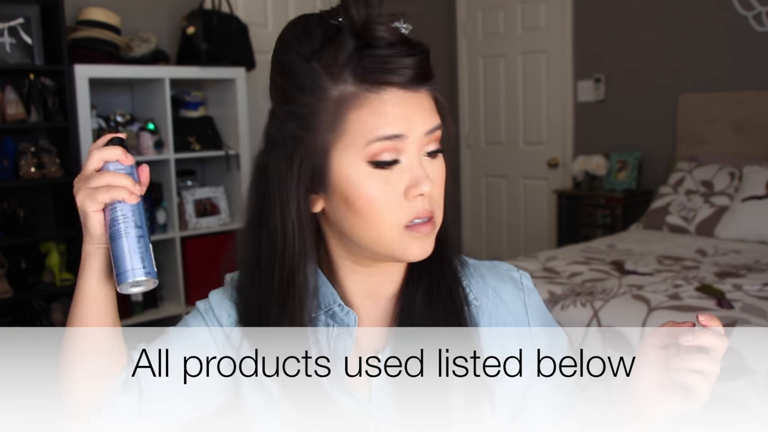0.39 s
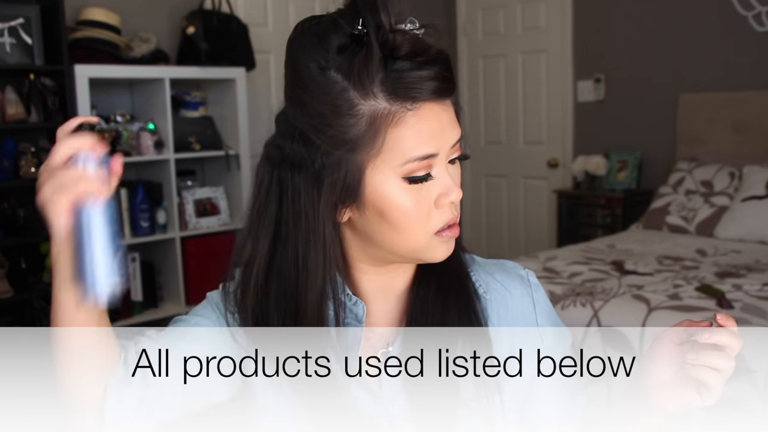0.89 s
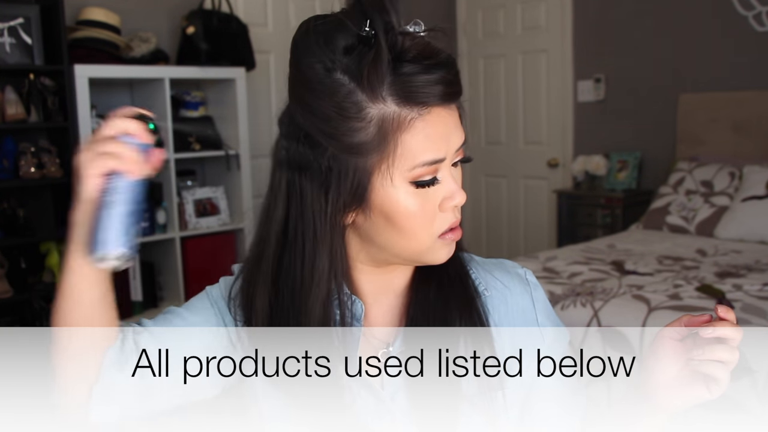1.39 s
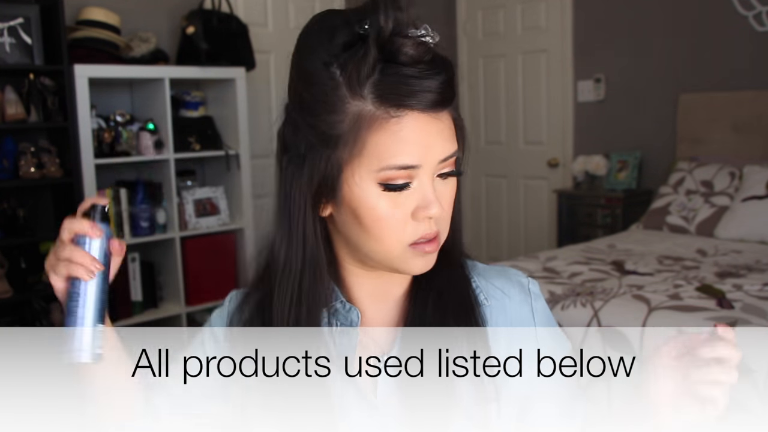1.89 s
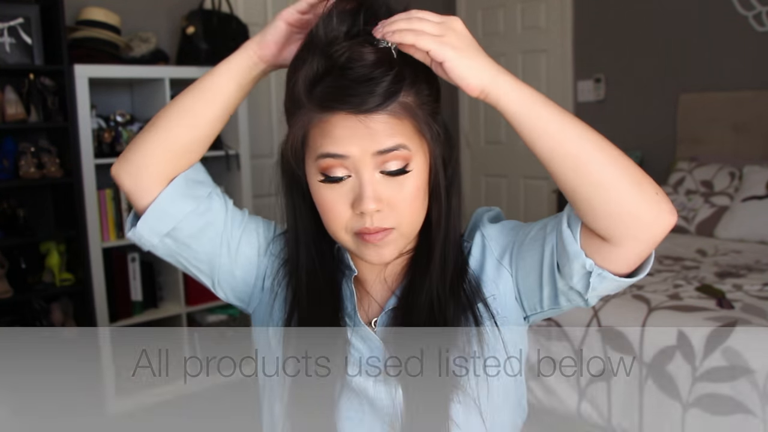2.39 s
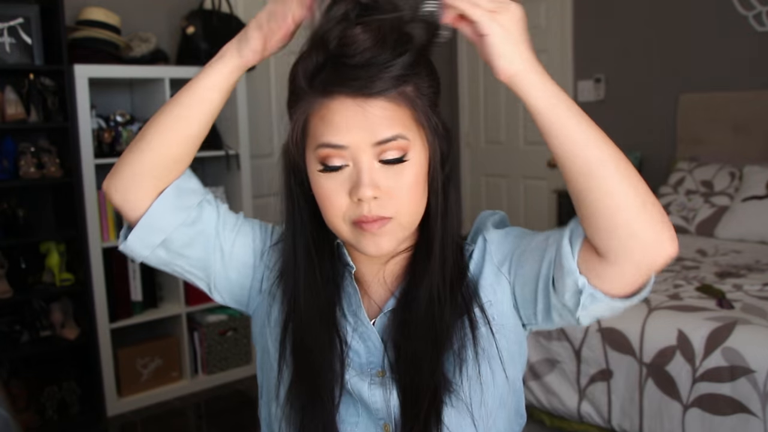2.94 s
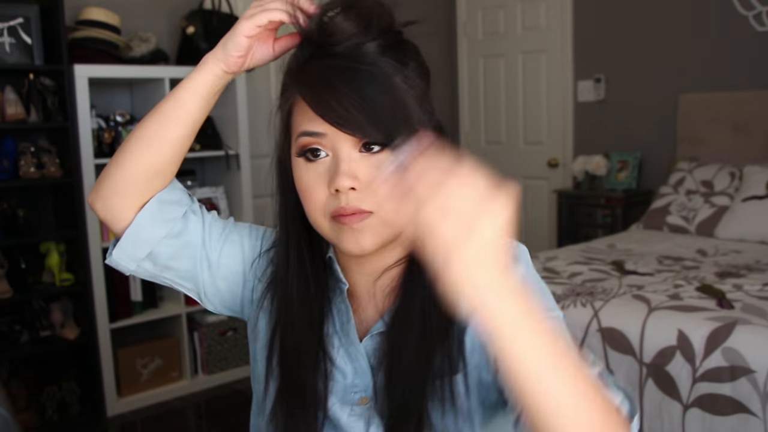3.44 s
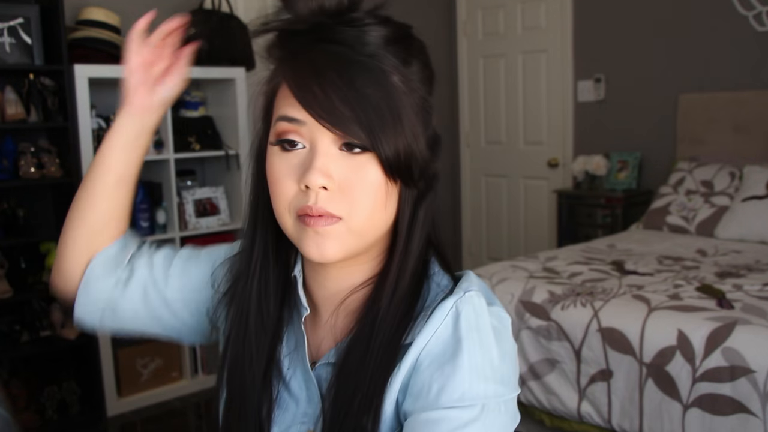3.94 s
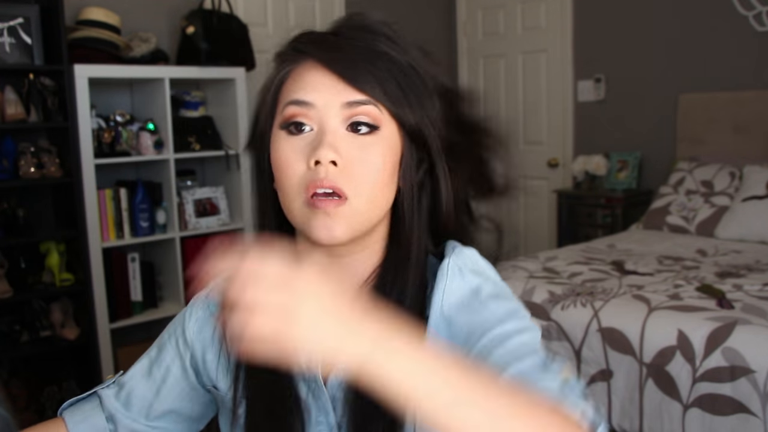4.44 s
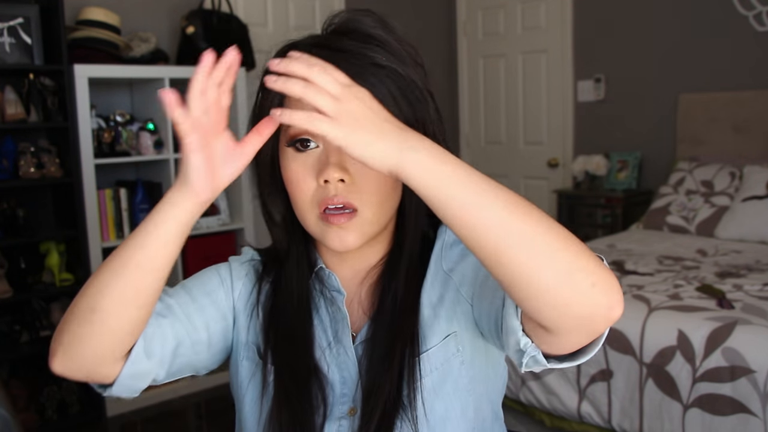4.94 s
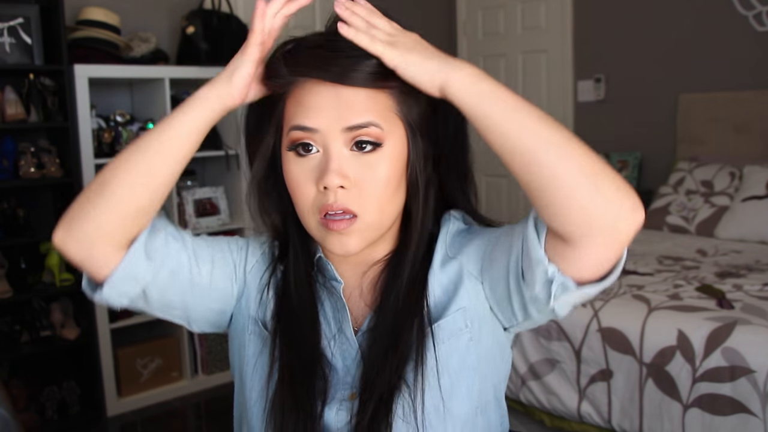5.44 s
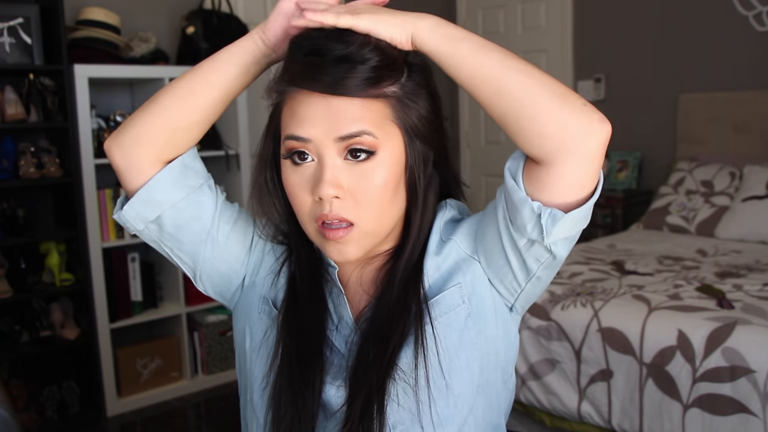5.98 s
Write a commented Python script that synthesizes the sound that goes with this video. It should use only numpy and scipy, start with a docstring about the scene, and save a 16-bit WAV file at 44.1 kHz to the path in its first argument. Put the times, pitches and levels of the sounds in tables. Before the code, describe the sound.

An aerosol can hisses brightly for two seconds in a bedroom, then after a quiet pause metal hair clips click, knock and rattle on wood.

```python
"""An aerosol can sprays in a furnished bedroom, waved about near a camera: shaped noise rushes and whistles.
Then hair clips are snapped open and tossed on a dressing table, where they skid, bounce and ring: short
bursts and noise excite resonances of steel and wood. Sleeves and hair rustle as soft strokes of noise.
The mains hums, the camera purrs faintly in a repeating pattern, and each channel of its preamp hisses
on its own."""
import sys
import numpy as np
from scipy import signal
from scipy.fft import rfft, irfft, next_fast_len
from scipy.io import wavfile
from scipy.ndimage import uniform_filter1d, map_coordinates

SR = 44100
rng = np.random.default_rng(int(sys.argv[2]) if len(sys.argv) > 2 else 0)


def gain_from_db(level_db):
    """Turn a decibel level (scalar or array-like) into a linear amplitude factor."""
    decades = np.asarray(level_db, float) / 20
    return 10 ** decades


def unload_wav(signal):
    """Save mono or channel-first audio to the path in sys.argv[1] as 16-bit WAV at rate SR, clipped to [-1, 1]."""
    wavfile.write(
        sys.argv[1],
        SR,
        np.round(np.clip(np.atleast_2d(signal).T, -1, 1) * 32767).astype(np.int16),
    )


N = 268436
TIME = np.arange(N) / SR


def unit(x):
    """Scales a sound to an rms (average strength) of 1."""
    return x / np.sqrt(np.mean(x ** 2) + 1e-20)


def along(points, hz):
    """Reads a curve of (Hz, value) points, joined by straight lines on a log frequency axis."""
    f, value = np.transpose(points)
    return np.interp(np.log(hz + 1), np.log(f + 1), value)


def wobble(rate):
    """A smooth random curve through rate random points a second."""
    knots = rng.standard_normal(int(N * rate / SR) + 4)
    return map_coordinates(knots, [TIME * rate])


def filtered(x, response):
    """Multiplies the spectrum of x by a complex response to frequency."""
    n = x.shape[-1]
    padded = next_fast_len(n + 8192)  # room for the ringing
    hz = np.fft.rfftfreq(padded, 1 / SR)
    return irfft(rfft(x, padded) * response(hz), padded)[..., :n]


def modes(resonances):
    """The response of several (Hz, width Hz, dB) resonances, which ring only after they are struck."""
    def response(f):
        total = 0
        for k, (centre, width, db) in enumerate(resonances):
            peak = 1j * f * width / (centre * centre - f * f + 1j * f * width)
            total = total + (-1) ** k * gain_from_db(db) * peak  # neighbours have opposite signs
        return total
    return response


def rush(spectrum, patchy_db):
    """Noise of rms 1, coloured by (Hz, dB) points, with random louder and softer patches in time and pitch."""
    z = signal.stft(rng.standard_normal(N + SR), nperseg=512)[2]
    patches = uniform_filter1d(rng.standard_normal(z.shape), size=8, axis=0)
    patches = uniform_filter1d(patches, size=6, axis=1)
    noise = signal.istft(z * gain_from_db(patchy_db * unit(patches)), nperseg=512)[1][:N]
    return unit(filtered(noise, lambda hz: gain_from_db(along(spectrum, hz))))


def swell_db(start, hold, rise, fall):
    """0 dB from start for hold seconds, with straight slopes in dB per second before and after."""
    before = np.maximum(start - TIME, 0)
    after = np.maximum(TIME - start - hold, 0)
    return -rise * before - fall * after


def strokes(rows, slopes):
    """The summed gain of (s, hold s, dB) events; slopes are rise and fall in dB per second."""
    return sum(gain_from_db(db + swell_db(s, hold, *slopes)) for s, hold, db in rows)


def background():
    """Room tone is noise, mains hum a wavering sine, and the camera's purrs are short swells of three sines."""
    # colour of the room tone: f/Hz, relative level per Hz/dB
    air = [(20, -13), (45, -6), (90, -3), (130, -9.5), (250, -10.5), (500, -15), (800, -15.5),
           (1500, -23.5), (5000, -24.5), (9000, -34)]
    # tones of the purr: f/Hz, level/dB before the swell
    purr_tones = [(622, -61.5), (716, -65), (506, -65.5)]
    # four unevenly spaced purrs: place in the cycle/fraction
    purr_steps = np.array([0, 2, 5, 7]) / 9
    cycle_s = .3749
    phase = (TIME - 2.347) / cycle_s % 1
    gaps = [np.abs((phase - step + .5) % 1 - .5) for step in purr_steps]
    gap_s = cycle_s * np.min(gaps, axis=0)  # time to the nearest purr
    swell = np.exp(-(gap_s / .016) ** 2) * gain_from_db(1.8 * wobble(9))
    purr = sum(gain_from_db(db) * np.sin(2 * np.pi * hz * TIME + 0.59 * wobble(13)) for hz, db in purr_tones)
    hum = gain_from_db(-55.5 + 0.78 * wobble(2.58)) * np.sin(2 * np.pi * 60 * TIME)
    return gain_from_db(-60) * rush(air, patchy_db=2.5) + hum + swell * purr


def spray():
    """Jet turbulence sounds the cavities of the spray head; droplets make it flutter."""
    # the can is waved to and fro: t/s, hiss level/dB (lowered by 1.83 dB when mixed), fizz level/dB
    wave = [(0.11, -37, -33), (0.2, -35.5, -31.5), (0.42, -35, -32), (0.55, -36, -32), (0.78, -37, -34),
            (0.88, -31, -29), (0.99, -34.5, -36), (1.032, -29, -27), (1.18, -33, -34), (1.25, -33.5, -30),
            (1.4, -37, -36), (1.43, -32.5, -31), (1.47, -31, -30.5), (1.61, -34.5, -33), (1.7, -34.5, -31),
            (1.76, -31, -32), (1.9, -30, -29), (2.11, -35, -33.5)]
    # noise colours of jet, mist on hair, fizz and puffs: f/Hz, relative level per Hz/dB
    jet_colour = [(700, -27), (1200, -15.5), (1800, -5.5), (2500, -3.5), (3500, -1), (4400, -2.5),
                  (6500, -1), (9000, -9.5), (11700, -16.5), (16000, -60)]
    roar_colour = [(250, -27), (420, -8), (700, -3.5), (1000, -3), (1500, -6), (2200, -14), (4000, -54)]
    fizz_colour = [(5000, -38), (8000, -9), (10800, -3.5), (13800, -4), (16000, -6.5)]
    puff_colour = [(60, -18), (100, 1), (180, -0.5), (330, 1), (500, -21), (1000, -60)]
    # cavities of nozzle and valve stem, each passed twice: f/Hz, width of one pass/Hz, level/dB
    nozzle_cavity = [(5290, 970, 0)]
    stem_cavity = [(2116, 180, 0)]
    # the stem sounds less as the can tips: t/s, level against the hiss/dB
    stem_levels = [(0, -10.5), (1.5, -10), (2.1, -15.5)]
    # low puffs of air: t/s, hold/s, level/dB
    puffs = [(0.16, 0.044, -49.5), (0.45, 0.18, -56), (0.88, 0.013, -54.5), (1.11, 0.019, -50.5),
             (1.46, 0.037, -54.5), (1.76, 0.24, -55)]

    s, *levels = np.transpose(wave)
    hiss_db, fizz_db = (np.interp(TIME, s, db) for db in levels)
    swing_db = hiss_db + 34  # against a calm hiss
    full_s, fade_s = 0.1, 2.107  # the spray has risen fully; it starts to fade out
    # the spray rises fast and fades out less steeply
    spray_db = swell_db(full_s, fade_s - full_s, rise=380.5, fall=173)

    # the roar swings wider than the hiss, the whistle less
    roar_gain = gain_from_db(-48.5 + 1.66 * swing_db + 0.68 * spray_db)
    whistle_gain = gain_from_db(-40 + 0.68 * swing_db + 2 * wobble(18) + 1.1 * spray_db)
    fizz_gain = gain_from_db(fizz_db + 1.34 * spray_db)

    stem = unit(filtered(rng.standard_normal(N), lambda hz: modes(stem_cavity)(hz) ** 2))
    stem_gain = gain_from_db(np.interp(TIME, *np.transpose(stem_levels)))
    jet = rush(jet_colour, patchy_db=1.12) + stem_gain * stem
    even_noise = rush([(1000, 0)], patchy_db=2.5)  # the same level at every pitch
    whistle = unit(filtered(even_noise, lambda hz: modes(nozzle_cavity)(hz) ** 2))

    lows = roar_gain * rush(roar_colour, patchy_db=0.5)
    lows = lows + strokes(puffs, (180, 90)) * rush(puff_colour, patchy_db=-1.0)
    highs = gain_from_db(hiss_db - 1.83 + spray_db) * jet + whistle_gain * whistle
    highs = highs + fizz_gain * rush(fizz_colour, patchy_db=1.0)
    flutter = gain_from_db(0.38 * wobble(41.14) + 0.36 * wobble(250))
    return flutter * highs + lows


def rustle():
    """Cloth and hair rub in soft clumps: fine, unsteady noise over a low swish."""
    # strokes of sleeves and hair: t/s, hold/s, fine rustle level/dB, low swish level/dB
    rubs = [(2.26, 0.59, -70, -73), (3.475, 0.12, -57, -53.5), (3.782, 0.37, -64.5, -63.5),
            (5.384, 0.28, -60.5, -65.5), (5.8, 0.19, -63, -71)]
    # noise colours of fine rustle and low swish: f/Hz, relative level per Hz/dB
    cloth_colour = [(900, -29), (1600, 4), (2900, 2.5), (5400, 1), (7000, -4), (12000, -11), (16000, -9.5)]
    swish_colour = [(120, -1), (250, -3), (600, -4), (1100, -2), (1700, -9), (3000, -15)]
    slopes = (86, 86)  # rise, fall (dB per s)
    fine = strokes([(s, hold, db) for s, hold, db, _ in rubs], slopes)
    low = strokes([(s, hold, db) for s, hold, _, db in rubs], slopes)
    fine = fine * gain_from_db(0.33 * wobble(60))
    return fine * rush(cloth_colour, patchy_db=0.8) + low * rush(swish_colour, patchy_db=0.1)


def snaps():
    """One sharp click and a faint after-rattle ring two short modes of the steel and a bright edge."""
    # steel snapping or ticking, off the table: t/s, peak level/dB, low mode f/Hz, high mode f/Hz
    clicks = [(3.4124, -37, 2600, 6030), (3.4198, -18, 3270, 4900), (3.7956, -39, 2300, 4300),
              (3.912, -39.5, 2300, 4240), (4.1362, -3.5, 3300, 5710), (4.5724, -25, 3640, 5500)]
    out = np.zeros(N + SR)
    for s, db, low_hz, high_hz in clicks:
        # loose contacts after the click: 27 dB weaker, dying by 60 dB in .02 s
        push = gain_from_db(-27 - 60 * TIME[:2048] / .02) * rng.standard_normal(2048)
        push[0] = 1
        parts = [(low_hz, 950, 0), (high_hz, 950, 1), (9200, 1800, -8)]  # (Hz, width Hz, dB)
        steel = [modes([part]) for part in parts]
        broad = modes([(4200, 7000, 0)])
        click = filtered(push, lambda f: sum(mode(f) for mode in steel) * broad(f) ** 2)
        out[round(s * SR):][:len(click)] += gain_from_db(db) * click / np.abs(click).max()
    return out[:N]


def room(x):
    """Weak near scatter, then the far wall answers; the bass lingers longest, and each .1 s has a new tail."""
    # how fast the echoes die: f/Hz, time to fall by 60 dB/s
    decay = [(200, 0.91), (1000, 0.43), (4000, 0.32), (12000, 0.47)]
    out, hop = np.zeros(N + SR), SR // 10
    for start in range(0, N, hop):
        piece = x[start:start + hop]
        if np.abs(piece).max() < gain_from_db(-90):  # too quiet to matter
            continue
        hz, t, z = signal.stft(rng.standard_normal(SR // 2), SR, nperseg=256)
        fade = gain_from_db(-60 * t / along(decay, hz)[:, None])
        tail = signal.istft(z * fade, SR, nperseg=256)[1]
        age = TIME[:len(tail)]
        wall_s = .027  # the far wall's answer arrives
        wall = 1 + 0.99 * np.exp(-np.abs(age - wall_s) / 0.014)
        tail = tail * np.where(age < wall_s, gain_from_db(-4.5), wall)
        wet = signal.fftconvolve(piece, tail / np.linalg.norm(tail))
        out[start:start + len(wet)] += wet
    return out[:N]


def rattle(t60):
    """Three short bursts of contacts that excite all frequencies nearly evenly, falling 60 dB in t60 seconds."""
    fade = gain_from_db(-60 * TIME[:4096] / t60)
    burst = fade * rng.standard_normal((3, len(fade)))
    for _ in range(4):
        z = rfft(burst)
        burst = irfft(z / np.abs(z))  # equal strength at every frequency
        burst = np.clip(3.94 * burst / np.abs(burst).max(), -fade, fade)  # back under the fade
    return burst


def hits():
    # clips knocking on the table, and a few wall echoes of the knocks: t/s, ring peak level/dB,
    # main ring f/Hz, table thud against ring/dB, bright edge against ring/dB
    knocks = [(4.0742, -46, 3200, 0, 1), (4.218, -10.5, 1780, -4, -9), (4.244, -15, 1960, -2.5, -9.5),
              (4.2715, -19, 1940, 1.5, -6), (4.5349, -35, 3200, -3, -3), (4.5411, -40, 3200, -3, 0),
              (4.6188, -30, 3520, -7, -10), (4.6379, -30, 1710, 1, -20), (4.6472, -10.5, 2840, -8.5, -16),
              (4.6752, -22, 1810, -12, -22), (4.785, -37, 1660, -6, -20), (4.8208, -27.5, 2020, -3, -34),
              (4.8384, -32.5, 3200, 3.5, -14), (4.8497, -28, 2200, 2, -32), (4.88, -26, 1800, 0, -35)]
    out = np.zeros(N + SR)
    for s, db, ring_hz, thud_db, edge_db in knocks:
        burst = rattle(t60=.022)
        body = modes([(ring_hz, 0.66 * ring_hz, 0), (2.06 * ring_hz, 1.0 * ring_hz, -1.5)])  # with an overtone
        ring = filtered(burst[0], lambda f: body(f) ** 3)
        edge = filtered(burst[1], lambda f: modes([(8800, 5500, 0)])(f) ** 3)
        thud = filtered(burst[2], lambda f: modes([(800, 1900, 0)])(f) ** 2)
        for part, rel_db in [(ring, 0), (edge, edge_db), (thud, thud_db)]:
            out[round(s * SR):][:len(part)] += gain_from_db(db + rel_db) * part / np.abs(part).max()
    return out[:N]


def table():
    """Uneven contact drums the modes of the board and scuffs its surface."""
    # modes of the table top: f/Hz, width/Hz, level/dB
    board_modes = [(215, 70, -10), (352, 113, 11), (513, 36, 3.5), (794, 110, -31)]
    # the table top drums under the clips: t/s, hold/s, level/dB
    drums = [(4.075, 0.024, -36), (4.218, 0.0054, -35.5), (4.29, 0.053, -47.5), (4.54, .13, -38.5),
             (4.79, .14, -47.5)]
    # clips scuff its surface: t/s, hold/s, level/dB
    scuffs = [(4.225, 0.069, -40.5), (4.31, 0.015, -46.5), (4.655, 0.013, -34.5), (4.835, .1, -49)]
    # colour of the scuffs: f/Hz, relative level per Hz/dB
    scuff_colour = [(400, -41), (900, 10.5), (2000, 3.5), (3600, -2), (6000, -5), (12000, -41)]
    contact = rng.standard_normal(N) * gain_from_db(2.6 * wobble(80))
    board = unit(filtered(contact, modes(board_modes)))
    scuff = gain_from_db(1.6 * wobble(200)) * rush(scuff_colour, patchy_db=1.5)
    return strokes(drums, (4300, 230)) * board + strokes(scuffs, (870, 120)) * scuff


def skids():
    """Chattering contact keeps the steel singing while a clip skids."""
    # one list of skids per clip: t/s, hold/s, level/dB
    slides = [
        [(4.077, 0.021, -40)],
        [(4.543, 0.0028, -41), (4.572, 0.057, -47.5)],
    ]
    # one list of steel modes per clip, passed twice: f/Hz, width of one pass/Hz, level of one pass/dB
    steels = [
        [(3200, 840, -1), (8130, 930, 3.5), (13100, 3100, -4)],
        [(5400, 1500, 4.5), (9770, 550, 4), (11200, 450, -1), (13700, 700, 1.5)],
    ]
    chatter = rng.standard_normal(N) * gain_from_db(4.1 * wobble(150))
    out = np.zeros(N)
    for rows, steel in zip(slides, steels):
        song = unit(filtered(chatter, lambda f: modes(steel)(f) ** 2))
        out += strokes(rows, (2500, 1300)) * song
    return out


def pings():
    # a clip rings free: t/s, low mode level/dB, middle mode level/dB, high mode level/dB
    bounces = [(4.6485, -65, -40, -60), (4.84, -45, -66, -45), (4.867, -49, -70, -59)]
    # the three modes: f/Hz, time to fall by 60 dB/s
    ping_modes = [(9728, 0.079), (11200, 0.07), (13650, 0.045)]
    out, t = np.zeros(N + SR), TIME[:SR // 4]
    for s, *levels in bounces:
        for db, (hz, t60) in zip(levels, ping_modes):
            drift = .02 * np.cumsum(rng.standard_normal(len(t)))
            tone = np.sin(2 * np.pi * hz * t + drift)
            out[round(s * SR):][:len(t)] += gain_from_db(db - 60 * t / t60) * tone
    return out[:N]


def scene():
    """All sources reach one microphone capsule, which feeds both channels."""
    clips = snaps() + hits() + skids()
    reverb = gain_from_db(np.where(TIME < 4.0, -9, -3))  # clips in the hand are nearer than those on the table
    mono = clips + room(reverb * clips) + pings() + table()
    mono = mono + spray() + rustle() + background()
    return np.array([mono, mono])


def band_limit(x):
    """A steep low-pass at the top of the band."""
    return signal.sosfilt(signal.butter(12, 16820, fs=SR, output="sos"), x)


def record(dry):
    """Each channel adds its own preamp hiss; a filter then removes everything above the band limit."""
    # colour of the preamp hiss: f/Hz, relative level per Hz/dB
    hiss_colour = [(20, 12), (80, 3.5), (300, 1), (700, 0), (14000, -8), (16000, -9)]
    hiss = filtered(rng.standard_normal(dry.shape), lambda hz: gain_from_db(along(hiss_colour, hz)))
    noisy = dry + gain_from_db(-58.5) * unit(hiss)
    mix = filtered(noisy, lambda hz: hz < 15750)
    return band_limit(mix)


dry = scene()
out = record(dry)
unload_wav(out)
```